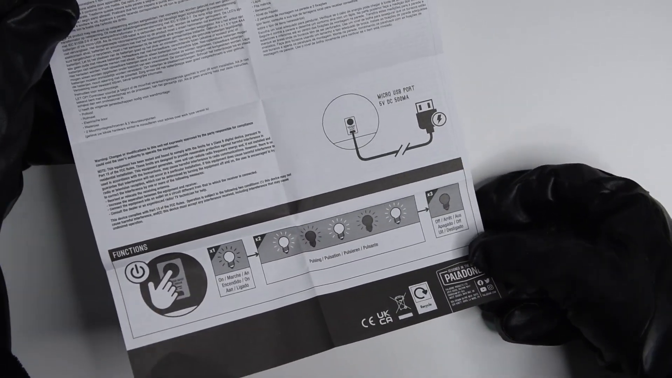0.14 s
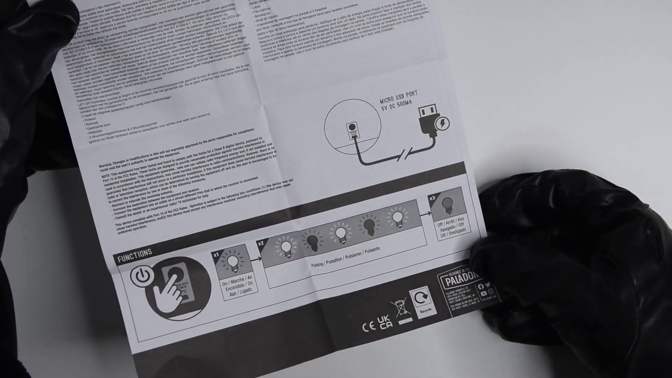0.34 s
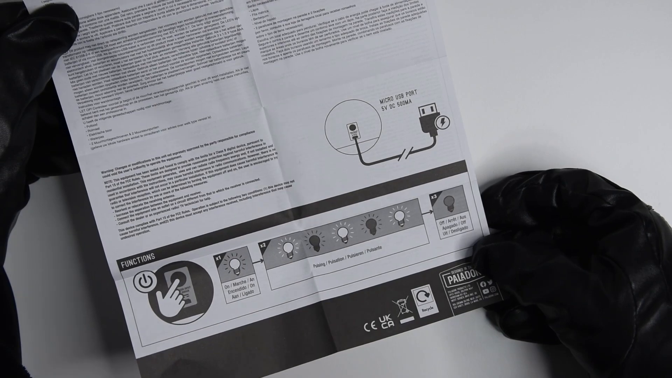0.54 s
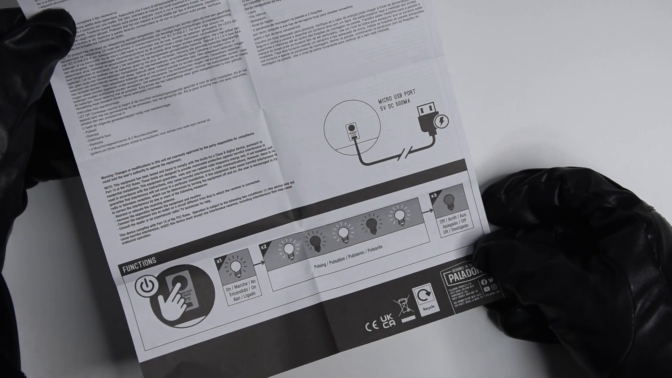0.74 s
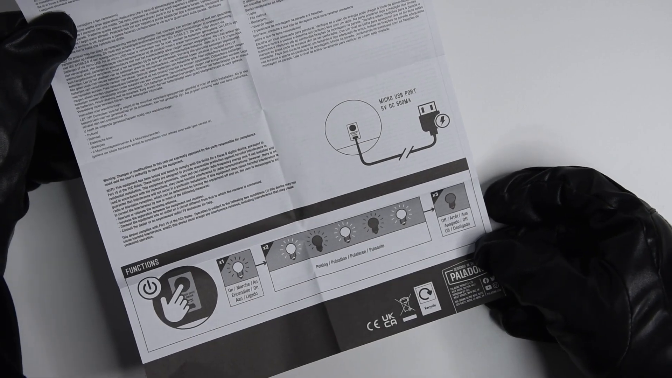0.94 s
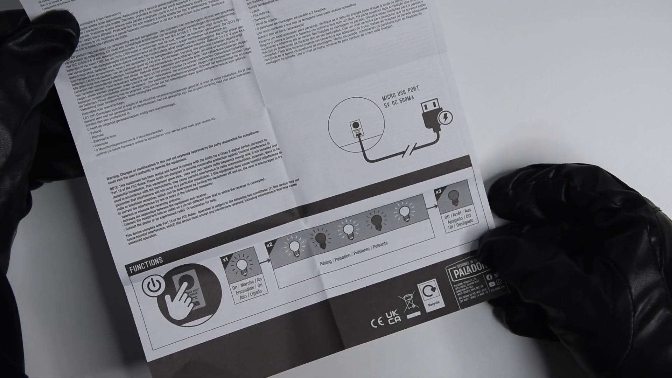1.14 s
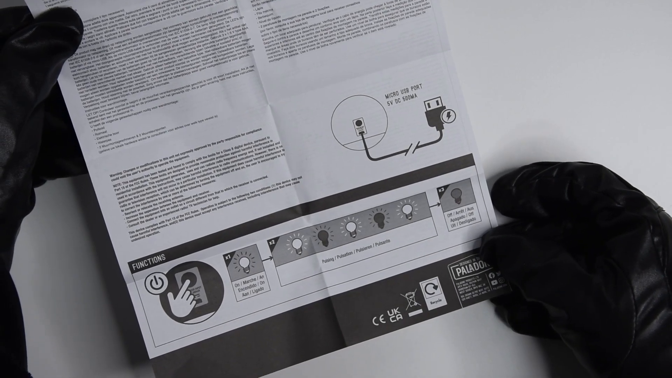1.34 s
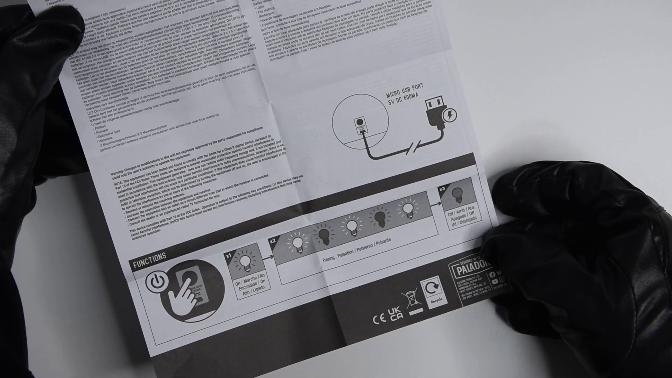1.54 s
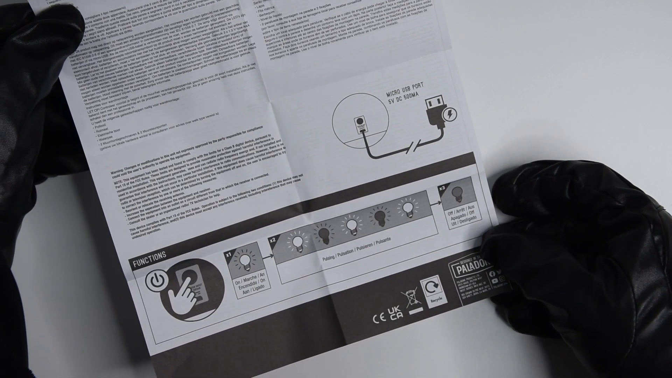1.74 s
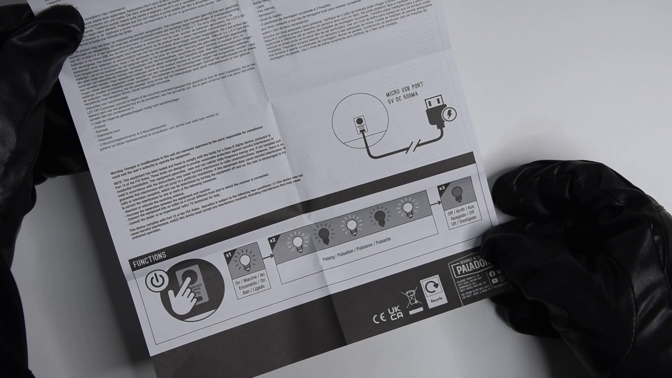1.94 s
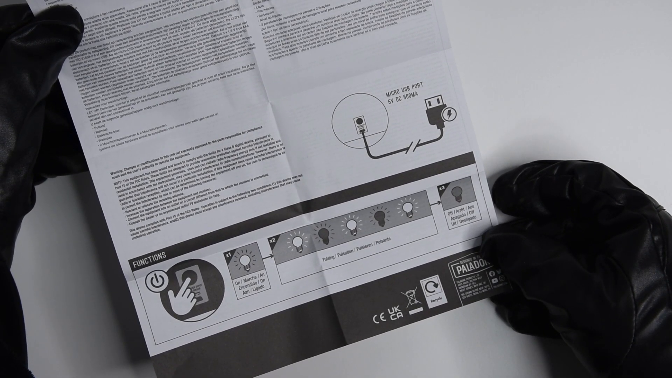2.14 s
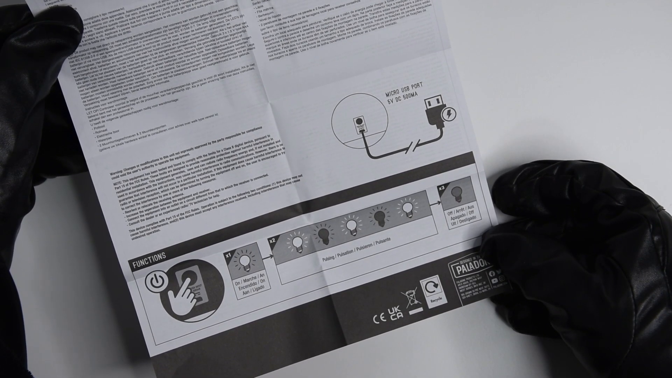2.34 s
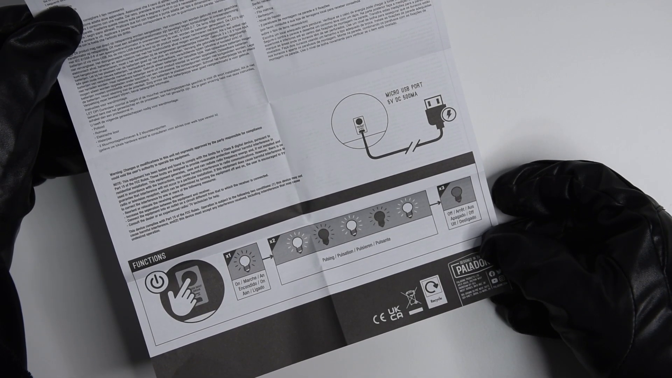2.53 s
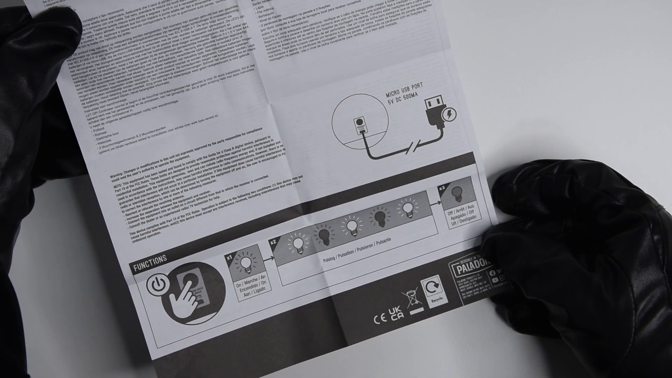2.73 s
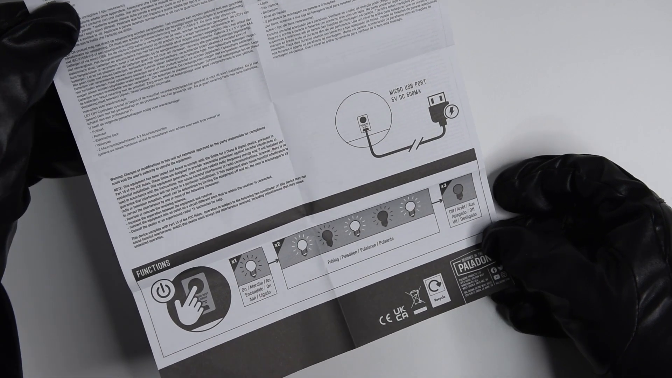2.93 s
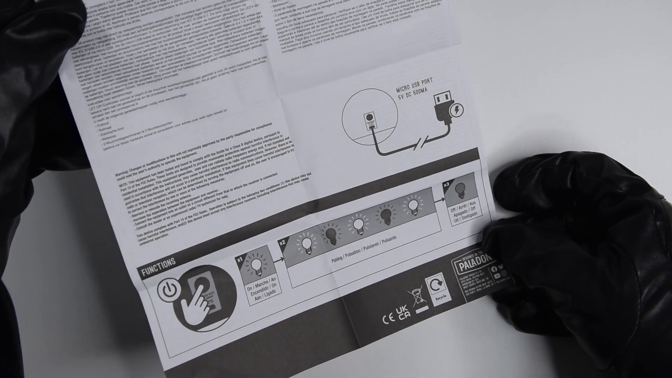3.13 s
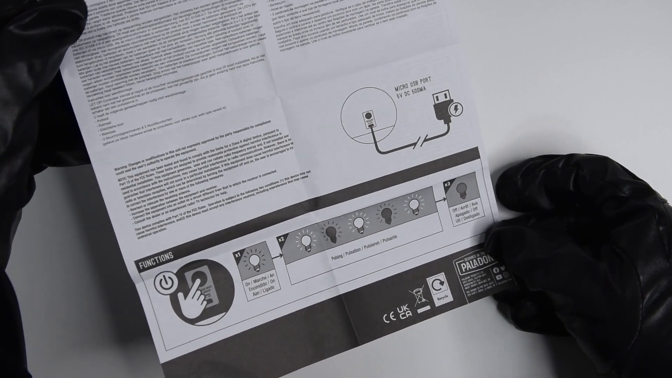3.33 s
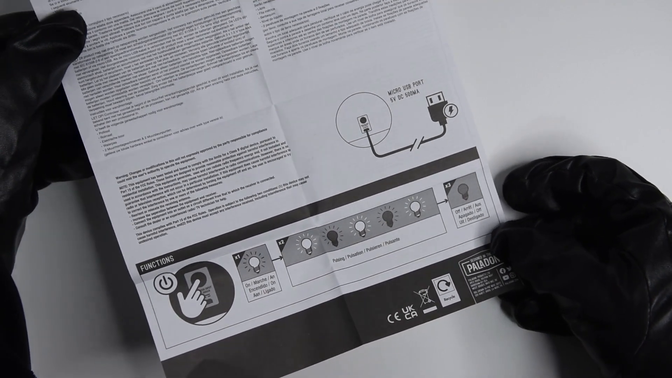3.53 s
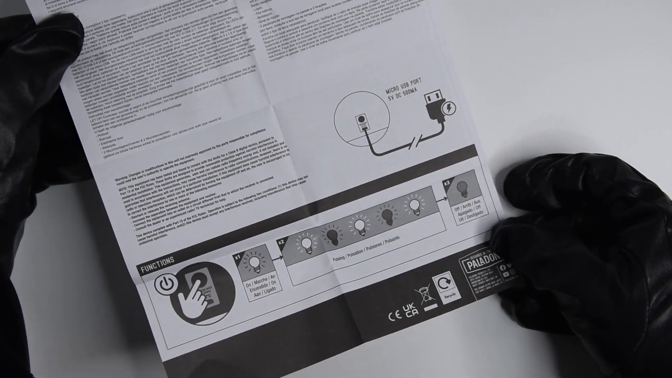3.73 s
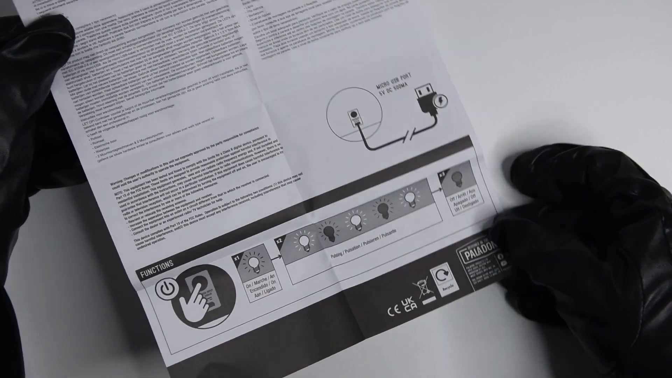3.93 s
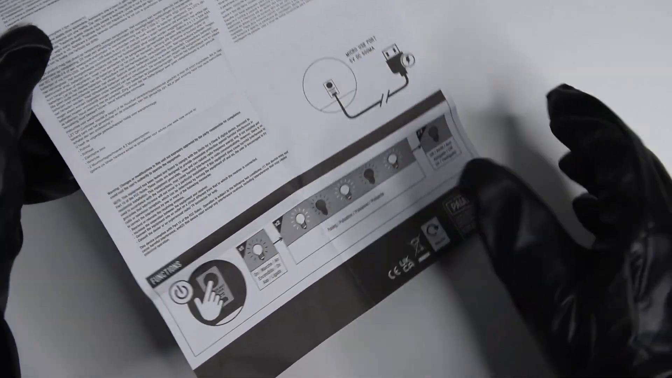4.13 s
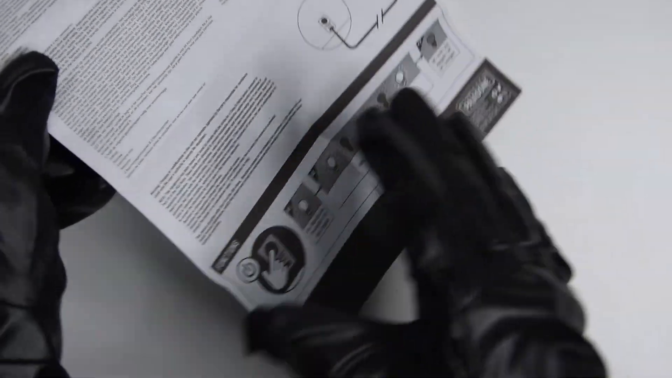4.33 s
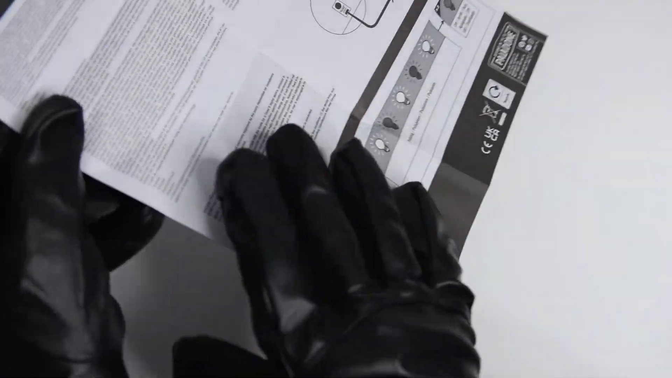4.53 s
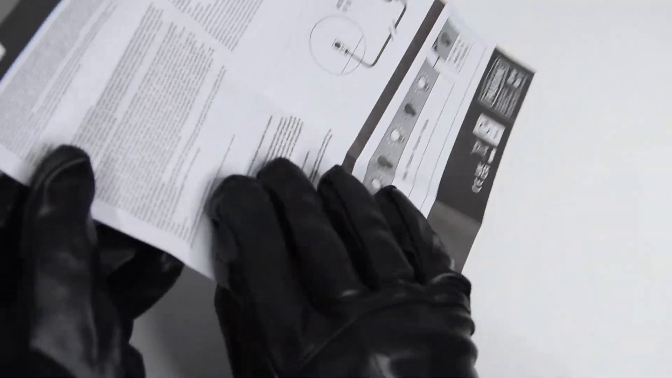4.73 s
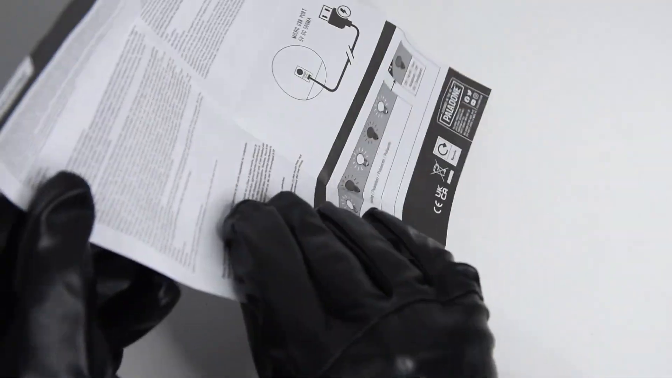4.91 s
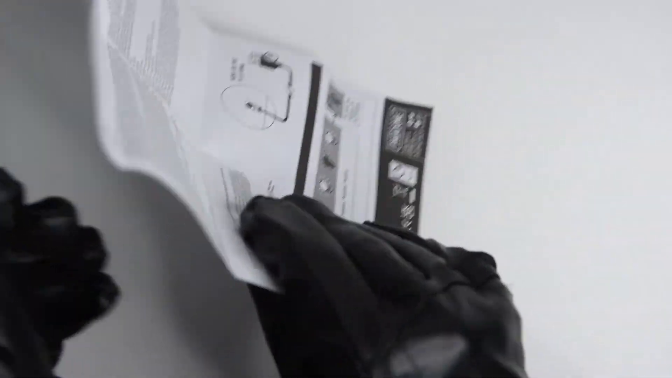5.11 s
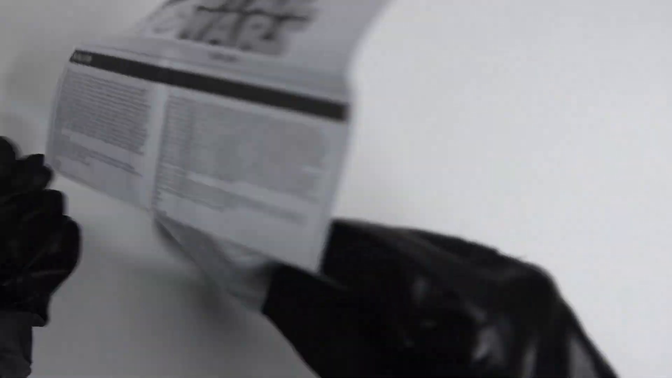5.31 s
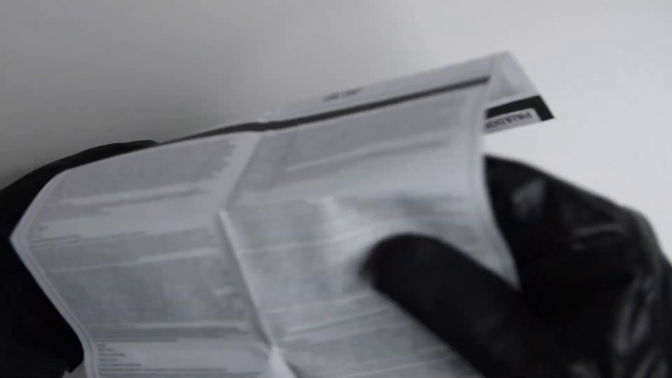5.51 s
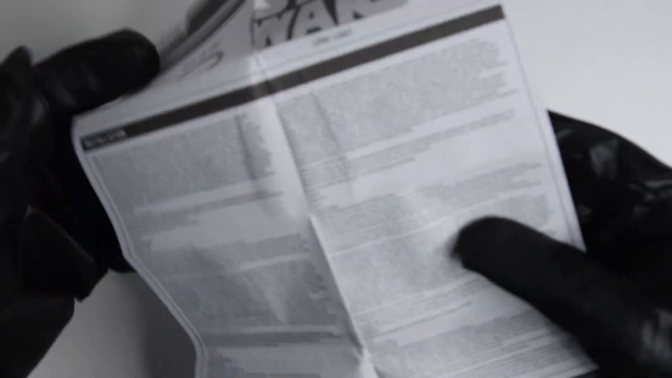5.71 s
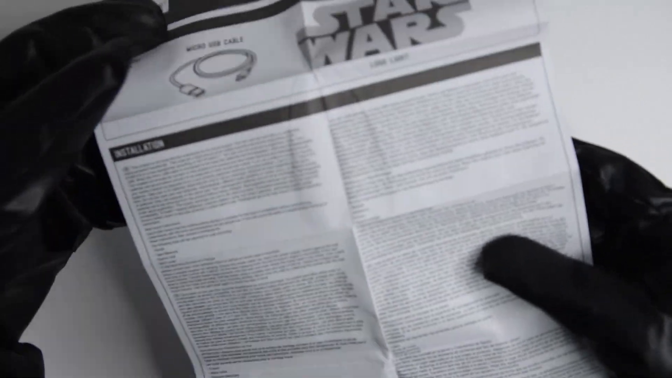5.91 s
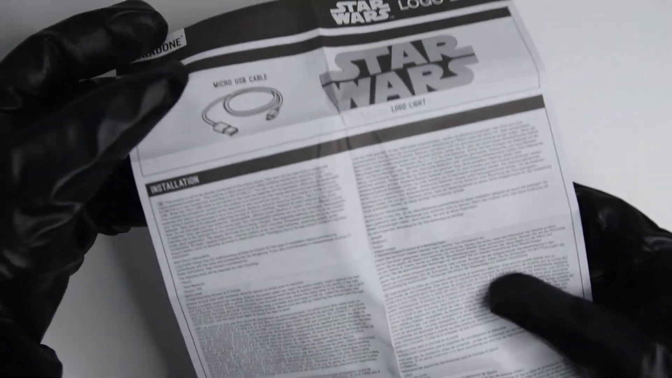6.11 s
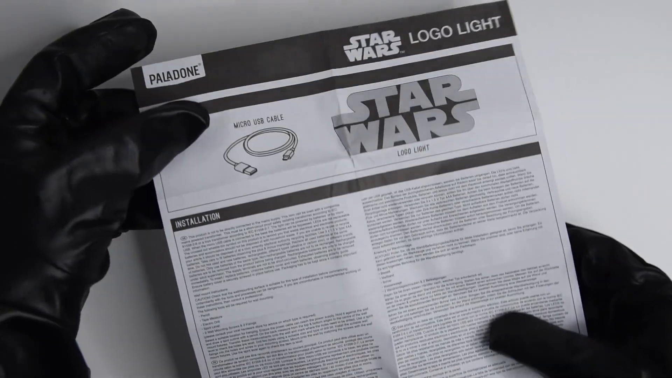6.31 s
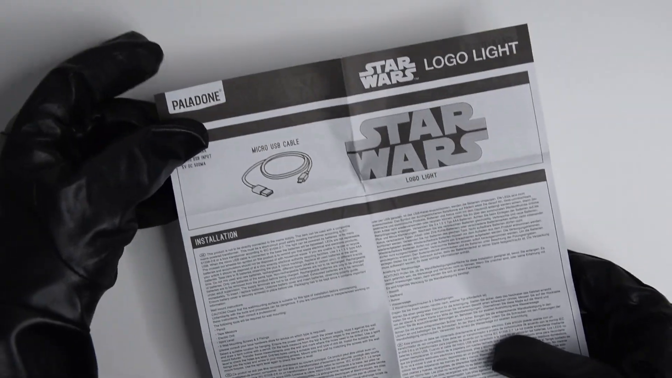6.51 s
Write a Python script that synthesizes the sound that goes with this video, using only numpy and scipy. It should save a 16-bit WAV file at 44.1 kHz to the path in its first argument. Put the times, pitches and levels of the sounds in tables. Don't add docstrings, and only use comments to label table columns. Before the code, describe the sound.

Close microphone over a table indoors: light pops and ticks of folded paper, a couple of clear snaps, then stillness with only hiss and low rumble. Gloves begin to slide with a dry swish, the paper buckles and flaps over with soft air thumps, crackling sharply until the handling eases at the very end.

```python
import sys
import numpy as np
from scipy import signal
from scipy.fft import rfft, irfft
from scipy.io import wavfile
from scipy.ndimage import uniform_filter1d

SR = 44100
rng = np.random.default_rng(int(sys.argv[2]) if len(sys.argv) > 2 else 0)


def wrap_up_sound(samples):
    columns = np.atleast_2d(samples).T
    tamed = np.clip(columns, -1, 1)
    steps = np.round(tamed * 32767).astype(np.int16)
    wavfile.write(sys.argv[1], SR, steps)


def decibels_to_gain(level_db):
    exponent = np.asarray(level_db, float) / 20
    return 10 ** exponent


N = 293706


# mode_hz, level_db, t60_s
TABLE_MODES = [(305, -21, 0.51), (461, -16, 0.33)]
# low_hz, high_hz, decay_ms, wall_echo_db, wall_t60_s
SNAP_PARTS = [
    (230, 730, 7.2, -12, 0.4),
    (720, 2650, 4.2, -18.5, 0.33),
    (2530, 6200, 3.5, -18, 0.35),
    (5920, 8720, 2.25, -18, 0.32),
]


def snaps(size=11000):
    start_s, body_db, panel_hz, thud_db, crisp_db, tick_db = creases()
    t = np.arange(size) / SR
    stretch = decibels_to_gain(0.12 * (body_db + 36.0) - 0.19 * (crisp_db - 1.0))
    stretch = np.clip(stretch, 0.25, 1.6)[:, None]
    top_hz = np.maximum(3200 * decibels_to_gain(0.51 * crisp_db), 1.52 * panel_hz)

    noise = rng.standard_normal((4, len(start_s), size))
    bursts = [n * heard(t, stretch, *part[2:]) for n, part in zip(noise, SNAP_PARTS)]
    thud, body, crisp, tick = (band(b, *part[:2], order=3) for b, part in zip(bursts, SNAP_PARTS))
    body = np.array([band(b, 0.49 * low, high) for b, low, high in zip(body, panel_hz, top_hz)])
    crisp = np.array([band(b, 1680, 1.98 * high) for b, high in zip(crisp, top_hz)])
    panel = np.array([band(b, hz / 1.29, hz * 1.21) for b, hz in zip(body, panel_hz)])
    body = body + decibels_to_gain(-5) * panel
    tick = tick + decibels_to_gain(-13.5) * band(bursts[3], 9850, 12800)

    table = sum(decibels_to_gain(db - 38) * ring(hz, t60, size) for hz, db, t60 in TABLE_MODES)
    thud = thud + signal.fftconvolve(thud[:, :size // 20], table[None], axes=1)[:, :size]

    parts = (thud, body, crisp, tick)
    parts_db = (thud_db, 0, crisp_db, tick_db)
    attacks = (640, 240, 200, 200)
    out = np.zeros(N + size)
    for part, part_db, attack in zip(parts, parts_db, attacks):
        gain = decibels_to_gain(body_db + part_db) / part[:, :attack].std(axis=1)
        for start, sound in zip((start_s * SR).astype(int), gain[:, None] * part):
            out[start:start + size] += sound
    return out[:N]


def heard(t, stretch, decay_ms, wall_db, t60):
    give = (1 - np.exp(-t / 0.000067)) * np.exp(-t * 1000 / (decay_ms * stretch))
    build_up = 1 - np.exp(-t / 0.0011)
    walls = decibels_to_gain(wall_db) * np.sqrt(stretch) * build_up * 1000. ** (-t / t60)
    return np.hypot(give, walls)


# start_s, body_db, panel_hz, thud_db, crisp_db (the last two against the body)
CRACKS = [(1.206, -31, 2270, -17.5, -9.5), (4.0, -54, 1150, -5.5, -16), (4.059, -53, 1600, -11, -3),
          (4.095, -49, 2030, -21, -5), (4.146, -57.5, 2300, -2, 1), (4.791, -36.5, 1640, -8.5, 0.5),
          (4.896, -29, 2180, -8.5, 2), (4.901, -35, 540, -7.5, -10), (5.052, -46.5, 1090, -8, 0),
          (5.118, -58.5, 740, 8, -17), (5.159, -50, 510, -1, -10), (5.18, -49.5, 510, 0.5, -11),
          (5.628, -48.5, 960, -9, -5), (5.708, -59, 610, 10.5, -16), (5.789, -42.5, 580, -6, -2.5),
          (5.871, -43, 1090, -1, -9), (5.88, -30.5, 980, -6, 0.5), (5.885, -28.5, 673, -12, -2.5),
          (5.934, -36, 3230, 0, 9), (6.265, -27, 1100, -24, -0.5), (6.271, -35.5, 1130, -14, -0.5),
          (6.456, -21, 1690, -35, -4.5), (6.647, -49, 560, -10, -12)]
# start_s, body_db, panel_hz, thud_db, crisp_db
BUCKLES = [(0.287, -31.5, 1590, -14, -2.5), (0.953, -42.5, 870, -14.5, -11.5),
           (1.214, -32, 1220, -24.5, -10), (3.124, -39, 750, -12, -11), (4.196, -38, 970, -9.5, -8),
           (4.639, -43, 1120, -6, -7), (4.765, -40, 770, -8, -6), (4.812, -38.5, 675, -11, -3.5),
           (4.858, -36.5, 2880, -7, -12), (4.866, -33.5, 2470, -12.5, -10), (5.067, -37.5, 1700, -9.5, -7),
           (5.071, -44, 544, -9, -9), (5.295, -32, 1250, -13.5, 0.5), (5.447, -40, 506, 0, -4.5),
           (5.536, -49.5, 510, 6.5, -10), (5.769, -37.5, 624, -1.5, 0), (5.929, -27, 1120, -24, -6.5),
           (5.964, -33.5, 950, -14, -11), (5.995, -46, 865, -22, -28), (6.258, -38.5, 1310, -12, -14),
           (6.293, -42, 960, -22, -14), (6.334, -33.5, 940, -15, -7), (6.417, -29.5, 3130, -21, -7.5),
           (6.462, -33, 2290, -17.5, 1)]
# start_s, body_db, panel_hz, thud_db, crisp_db
POPS = [(0.019, -50.5, 940, -33, -24), (0.201, -36.5, 895, -12, -13.5), (0.264, -45.5, 837, -7, -27),
        (0.268, -44, 750, -8, -25), (0.279, -36.5, 750, -19, -15), (2.901, -48.5, 1230, -7, -26),
        (3.085, -59.5, 800, -6, -26), (3.292, -59, 796, -5, -24), (3.477, -56.5, 880, -3, -31),
        (5.478, -50, 806, -14, -20), (6.214, -43, 915, -7.5, -26), (6.441, -33.5, 1560, -13, -21)]
# start_s, body_db, panel_hz
TICKS = [(0.066, -67, 1020), (0.113, -61, 1040), (0.153, -55.5, 1070), (0.623, -66, 2140),
         (0.641, -58, 1040), (0.669, -64, 1310), (0.678, -63, 2020), (0.708, -60, 2380), (0.723, -63, 2060),
         (0.851, -62.5, 920), (0.888, -61, 1540), (0.915, -55, 2310), (1.124, -58.5, 1060),
         (2.373, -65, 1270), (2.706, -61.5, 830), (2.766, -69, 1200), (2.835, -59.5, 790),
         (2.851, -66, 2400), (3.712, -62.5, 1250), (3.773, -61, 1820), (3.798, -59.5, 1290),
         (3.821, -58, 1400), (3.863, -66, 890), (3.889, -63, 1480), (3.978, -60, 1960), (4.194, -46.5, 890),
         (4.283, -53, 1720), (5.569, -53, 2430)]
# start_s, body_db, panel_hz
TEARS = [(0.207, -55, 890), (.293, -32, 1300), (.957, -48, 1680), (2.904, -53, 1120), (3.131, -49, 810),
         (4.009, -50.5, 900), (4.202, -40, 1960), (5.132, -61, 560), (5.299, -64, 1230), (5.721, -53, 610),
         (6.338, -35, 1010), (6.466, -36, 1480)]


def creases():
    first = [(*row, row[4] - 5.5) for row in CRACKS]
    first += [(*row, row[4] - 17.5) for row in BUCKLES]
    first += [(*row, -31) for row in POPS]
    ticks = [(*row, -21.5, -7.5, -15) for row in TICKS]
    tears = []
    for row in TEARS:
        parent = max(give for give in first if give[0] < row[0])
        tears.append((*row, *(parent[3:] + np.array([-6.5, -5, -5]))))
    return np.transpose(first + ticks + tears)


# low_hz, high_hz, slip_scatter_db, patchiness_db
RUB_LAYERS = [
    (2600, 7400, 2.5, 0.56),
    (586, 2150, 3.5, 3),
    (9640, 15000, 2, -2.4),
    (84, 513, 2, 4),
]
# centre_hz, width_hz, level_db
SHEET_MODES = [(1150, 220, -7.5), (1980, 73, -19), (3000, 330, -8), (8400, 1040, -4)]


def slide():
    flex_db, swing_db, held = hands()
    stroke_db, bright_db = strokes()
    hiss_db = both(stroke_db, flex_db - 4)
    air_db = -60.5 + 1.2 * (hiss_db + 51.5) + bright_db
    layers_db = hiss_db, flex_db, air_db, swing_db - 1.5
    sizes = np.minimum(rng.exponential(size=N), 6.5)
    slips = rng.standard_normal(N)
    grip = walk(30)
    out = 0
    for (low_hz, high_hz, scatter_db, patchy_db), db in zip(RUB_LAYERS, layers_db):
        rub = unit(band(slips * decibels_to_gain(scatter_db * sizes), low_hz, high_hz, order=3))
        out = out + rub * decibels_to_gain(db + 1.34 * grip + patchy_db * walk(30))
    out = out + resonate(out, SHEET_MODES)
    return out * held * decibels_to_gain(-6.0)


# start_s, length_s, hiss_db, brightness_db
STROKES = [(.6, 0.29, -76, 4), (2.767, .14, -68, 0), (3.74, .08, -85, 0), (3.964, .08, -58.5, 0),
           (4.058, .03, -51, 0.5), (4.147, .04, -58, 3), (4.207, 0.11, -49.5, 0.5), (4.337, .05, -52.5, -4),
           (4.407, 0.054, -50.5, 0.5), (4.52, 0.12, -60.5, -1), (4.67, 0.04, -63, 4),
           (4.95, 0.045, -53.5, 1), (5.13, 0.016, -56.5, 1), (5.206, 0.069, -45, 3),
           (5.35, 0.019, -50.5, 2), (5.417, 0.064, -53.5, 1), (5.566, 0.096, -53, -2),
           (5.793, 0.038, -53, -2), (6.137, 0.055, -53, 2), (6.324, 0.019, -57, -11),
           (6.582, 0.062, -59, 0)]


def strokes():
    t = np.arange(N) / SR
    rows = []
    for start_s, length_s, db, _ in STROKES:
        rise_db = (start_s - t) * 332
        fall_db = (t - start_s - length_s) * 155
        rows.append(db - np.maximum(0, np.maximum(rise_db, fall_db)))
    loudest = np.argmax(rows, axis=0)
    bright_db = uniform_filter1d(np.array(STROKES)[loudest, 3], size=800)
    return np.maximum(np.max(rows, axis=0), -120), bright_db


# time_s, flexing_db, swinging_db
HAND_MOTION = [(0.0, -63, -63.5), (.9, -71, -69.5), (1.19, -75, -68), (2.6, -71, -86.5), (3.1, -74, -68),
               (3.9, -70, -74.5), (4.0, -58, -74), (4.18, -64, -72), (4.23, -55.5, -64), (4.32, -54.5, -69),
               (4.6, -68, -65), (4.75, -53, -56), (5.15, -55.5, -52.5), (5.631, -52.5, -52.5),
               (5.86, -52, -49), (6.05, -49.5, -59.5), (6.34, -49.5, -60), (6.66, -60.5, -70)]


def hands():
    t = np.arange(N) / SR
    time_s, flex_db, swing_db = np.transpose(HAND_MOTION)
    rest_s, grip_s = 1.35, 2.55
    held = np.clip(np.maximum(rest_s - t, t - grip_s) * 20, 0, 1)
    return np.interp(t, time_s, flex_db), np.interp(t, time_s, swing_db), held


# start_s, level_db, pitch_hz
THUMPS = [(.02, -67, 55), (0.278, -53, 150), (3.124, -60, 230), (4.2, -52.5, 130), (4.861, -45.5, 120),
          (4.898, -42, 140), (5.071, -50.5, 170), (5.119, -49, 220), (5.191, -50.5, 160), (5.296, -44, 151),
          (5.45, -51, 180), (5.535, -55, 110), (5.72, -57, 320), (5.884, -54, 200), (6.266, -53, 180)]
# start_s, level_db
FLECKS = [(2.853, -62), (4.096, -58), (4.897, -36.5), (5.052, -57), (5.14, -57), (5.311, -45), (5.376, -52),
          (5.567, -58), (5.79, -60), (5.889, -35), (6.276, -57), (6.335, -54), (6.468, -44), (6.627, -64)]


def slaps(size=4000):
    t = np.arange(size) / SR
    out = np.zeros(N + size)
    for start_s, db, hz in THUMPS:
        swell = t * hz * np.exp(-2 * t * hz / 1.3)
        push = band(rng.standard_normal(size) * swell, hz / 1.2, hz * 1.43, order=1)
        out[int(start_s * SR):][:size] += decibels_to_gain(db) * push / push[:size // 5].std()
    for start_s, db in FLECKS:
        burst = rng.standard_normal(size) * heard(t, 0.72, 2.6, -20, 0.2)
        fleck = band(burst, 7200, 15600)
        out[int(start_s * SR):][:size] += decibels_to_gain(db) * fleck / fleck[:size // 20].std()
    return out[:N]


def crackle(size=600):
    flex_db, _, held = hands()
    clicks_per_s, decay_ms = 90, 2.2
    when = rng.random(N) < clicks_per_s / SR
    sizes = np.minimum(rng.exponential(size=N), 3)
    decay = np.exp(-np.arange(size) / SR * 1000 / decay_ms)
    gate = signal.fftconvolve(when * decibels_to_gain(3.5 * sizes), decay)[:N]
    return unit(band(rng.standard_normal(N), 600, 2860)) * gate * decibels_to_gain(flex_db - 5) * held


# centre_hz, width_hz, level_db
CREAK_MODES = [(1200, 120, 2), (2010, 170, -9)]


def creak():
    t = np.arange(N) / SR
    start_s, length_s, slips_per_s = 6.105, 0.076, 140
    press = np.sin(np.pi * np.clip((t - start_s) / length_s, 0, 1))
    count = np.floor(np.cumsum(slips_per_s * decibels_to_gain(2 * walk(90))) / SR)
    slips = np.diff(count, prepend=0) * decibels_to_gain(3 * rng.standard_normal(N))
    return decibels_to_gain(-52) * press * unit(resonate(slips, CREAK_MODES))


def room(size=12000):
    t = np.arange(size) / SR
    echoes = decibels_to_gain(-45.5) * rng.standard_normal(size) * 1000. ** (-t / 0.62)
    return (t == 0) + echoes * (t > 0.003)


def rumble():
    _, swing_db, held = hands()
    lag = int(0.1 * SR)
    rest_db = -9 * (1 - np.roll(held, lag))
    hum_db = both(-71.5 + rest_db, swing_db - 9) + 1.5 * walk(4.5)
    push_db = both(-72, swing_db - 0.5) + 1.5 * walk(5)
    hum = unit(band(rng.standard_normal(N), 39, 65)) * decibels_to_gain(hum_db)
    push = unit(band(rng.standard_normal(N), 5.1, 25)) * decibels_to_gain(push_db - 3.5)
    return hum + push


# freq_hz, density_db
HISS = [(35, -47), (60, -12.5), (113, -3.5), (197, -10), (279, -14.5), (314, -9.5), (344, -16), (500, -15),
        (1100, -19.5), (1330, -19.5), (2120, -21), (9400, -23), (15700, -23)]
# freq_hz, side_minus_mid_db
HISS_SIDE = [(60, 1), (110, -18), (200, -11.5), (380, -10.5), (700, -9), (1290, -8), (2380, -4),
             (4400, -2.5), (8120, -2.5), (15000, -3.5)]


def microphone_hiss():
    mid = coloured(HISS)
    side = coloured(HISS, HISS_SIDE) * np.array([[1], [-1]])
    return (mid + side) * decibels_to_gain(-64.5) / np.std(mid)


def band(x, lo_hz, hi_hz, order=2):
    edges = [lo_hz, min(hi_hz, 0.45 * SR)]
    return signal.sosfilt(signal.butter(order, edges, "band", fs=SR, output="sos"), x)


def resonate(x, modes):
    return sum(decibels_to_gain(db) * band(x, hz - width / 2, hz + width / 2, order=1) for hz, width, db in modes)


def ring(hz, t60, size):
    t = np.arange(size) / SR
    return np.sin(2 * np.pi * hz * t) * 1000. ** (-t / t60)


def unit(x):
    return x / np.sqrt(np.mean(x ** 2))


def both(a_db, b_db):
    return 10 * np.log10(decibels_to_gain(a_db) ** 2 + decibels_to_gain(b_db) ** 2)


def walk(rate):
    hold = int(SR / rate)
    steps = np.repeat(rng.standard_normal(N // hold + 1), hold)
    return unit(uniform_filter1d(steps, hold)[:N])


def coloured(*spectra):
    log_hz = np.log(np.fft.rfftfreq(N, 1 / SR) + 1)
    db = 0
    for curve in spectra:
        hz, level_db = np.transpose(curve)
        db = db + np.interp(log_hz, np.log(hz), level_db)
    return irfft(rfft(rng.standard_normal(N)) * decibels_to_gain(db), N)


def scene():
    handled = signal.fftconvolve(slide() + crackle() + creak(), room())[:N]
    paper = snaps() + slaps() + handled
    return paper + rumble() + decibels_to_gain(-44.0) * rumble() * np.array([[1], [-1]])


def roll_off(x):
    return signal.sosfilt(signal.butter(12, 16650, fs=SR, output="sos"), x)


def record(dry):
    capsule_hz = 8880
    dry = dry + decibels_to_gain(-8) * band(dry, capsule_hz / 1.06, capsule_hz * 1.04, order=1)
    top = signal.butter(8, 15800, fs=SR, output="sos")
    mix = signal.sosfilt(top, dry + microphone_hiss())
    return roll_off(mix)


dry = scene()
out = record(dry)
wrap_up_sound(out)
```